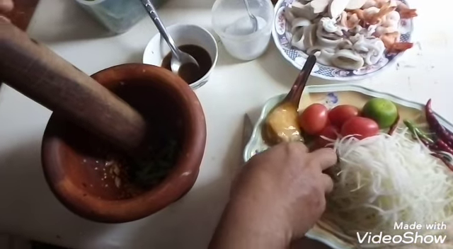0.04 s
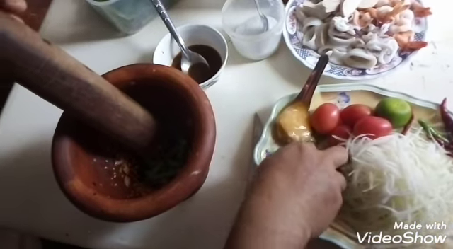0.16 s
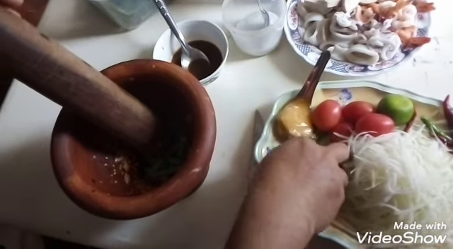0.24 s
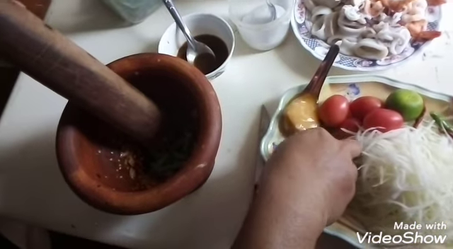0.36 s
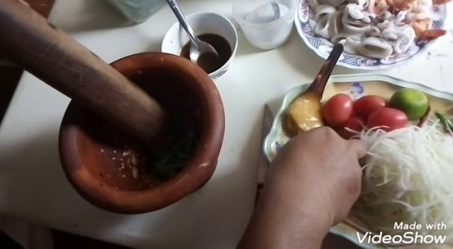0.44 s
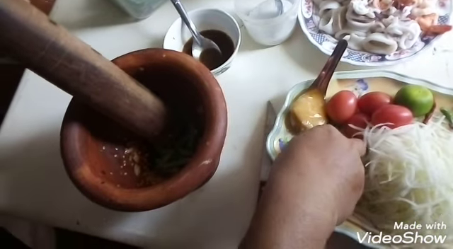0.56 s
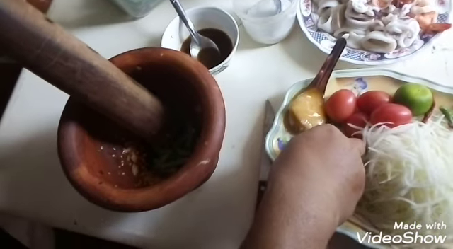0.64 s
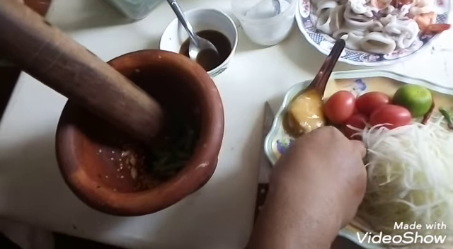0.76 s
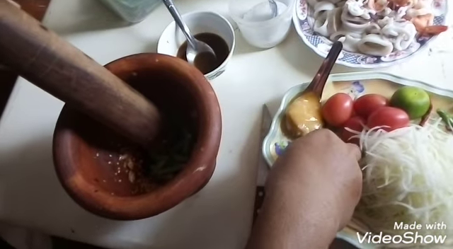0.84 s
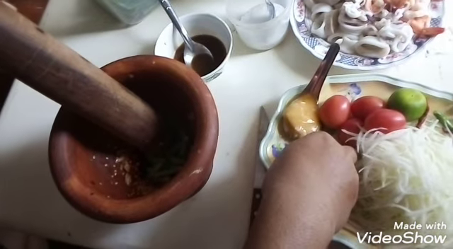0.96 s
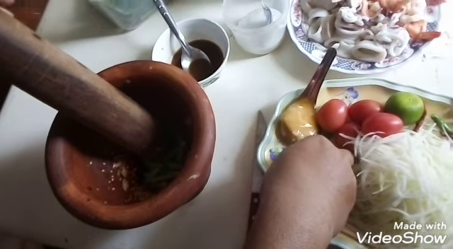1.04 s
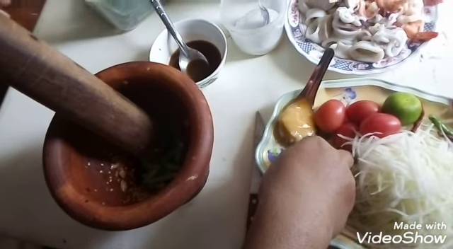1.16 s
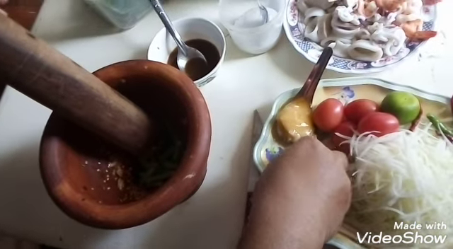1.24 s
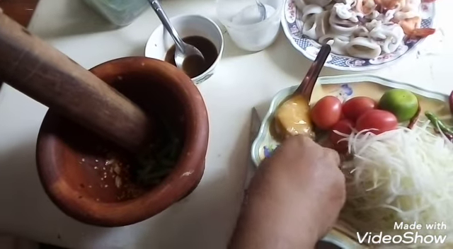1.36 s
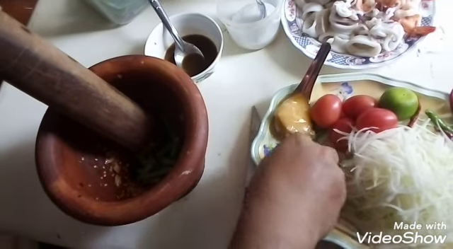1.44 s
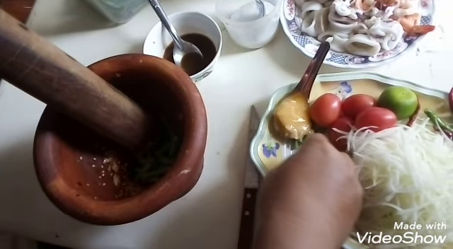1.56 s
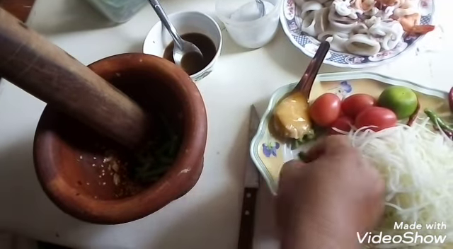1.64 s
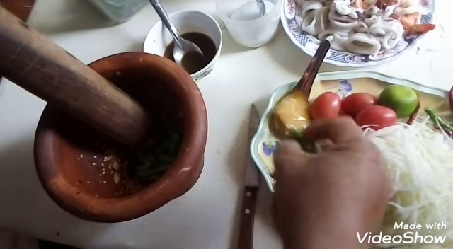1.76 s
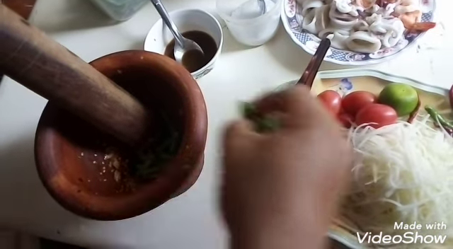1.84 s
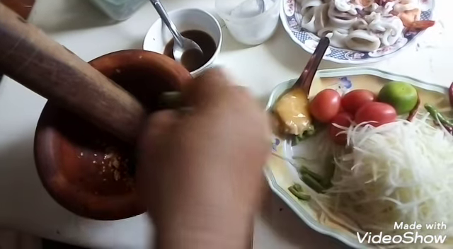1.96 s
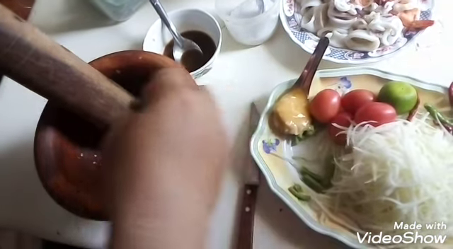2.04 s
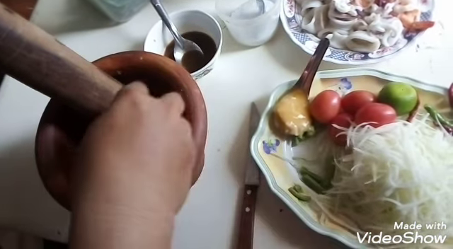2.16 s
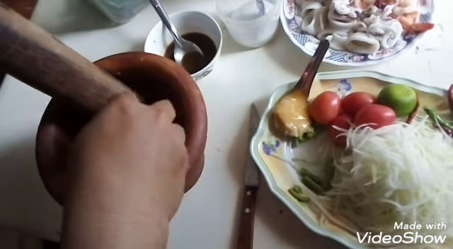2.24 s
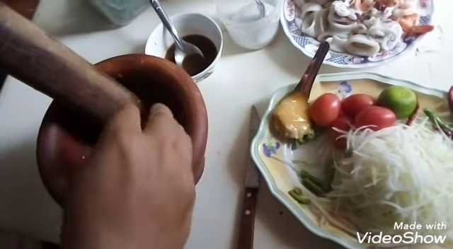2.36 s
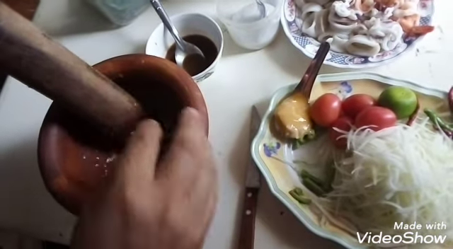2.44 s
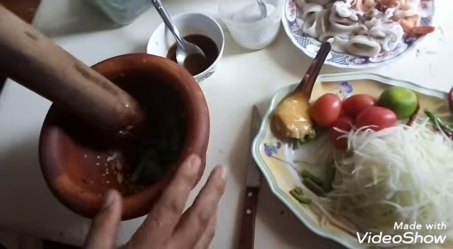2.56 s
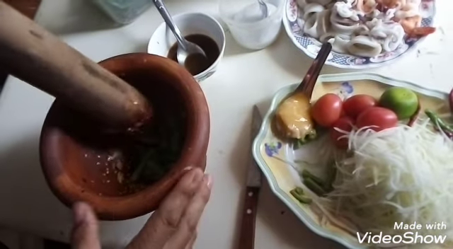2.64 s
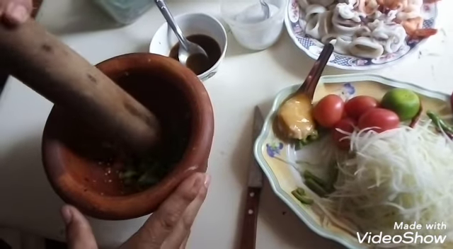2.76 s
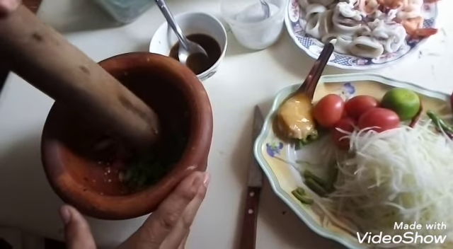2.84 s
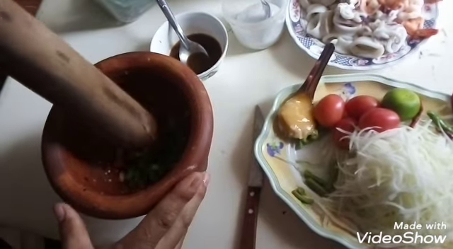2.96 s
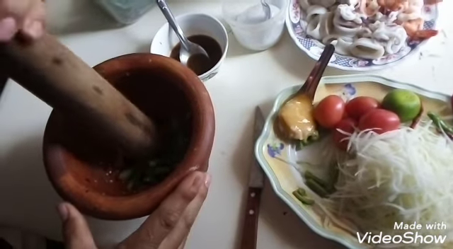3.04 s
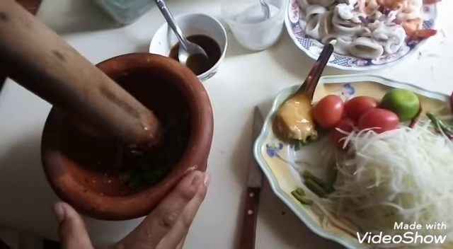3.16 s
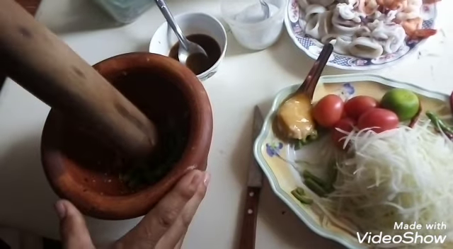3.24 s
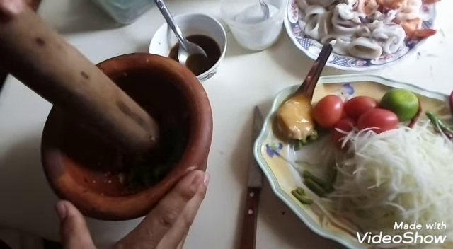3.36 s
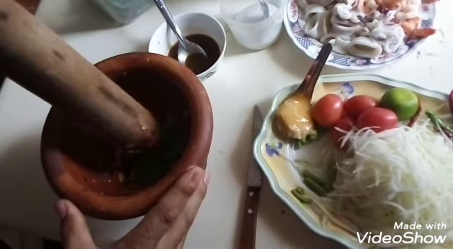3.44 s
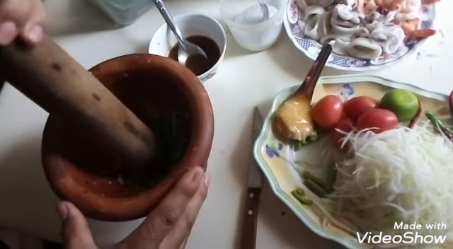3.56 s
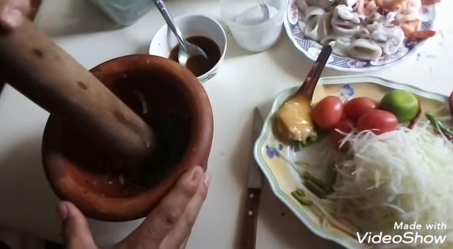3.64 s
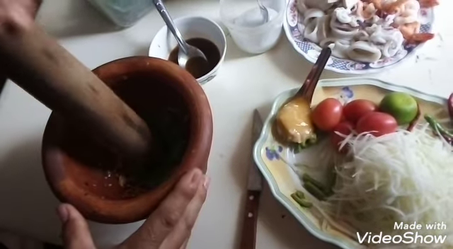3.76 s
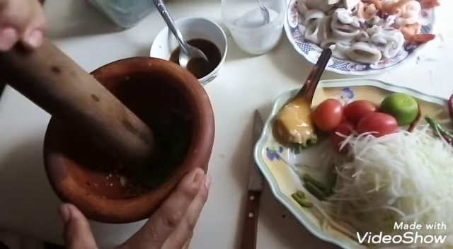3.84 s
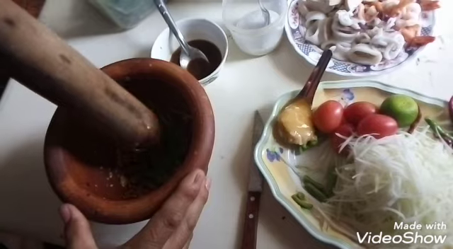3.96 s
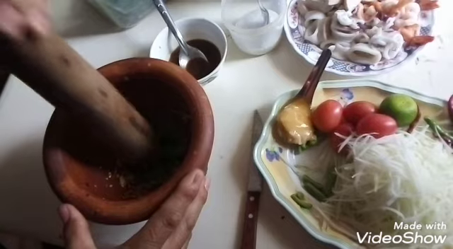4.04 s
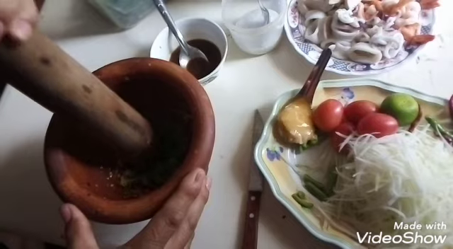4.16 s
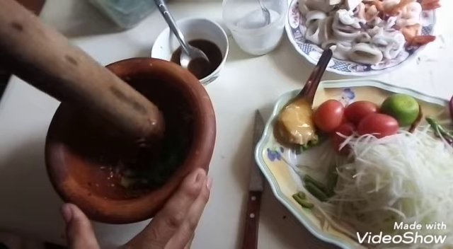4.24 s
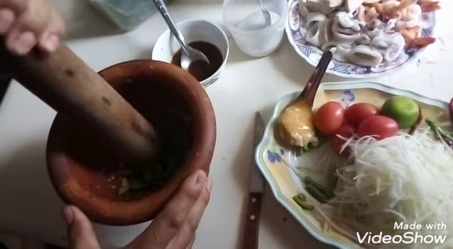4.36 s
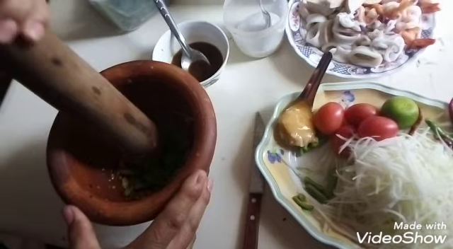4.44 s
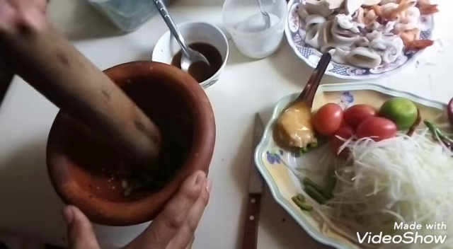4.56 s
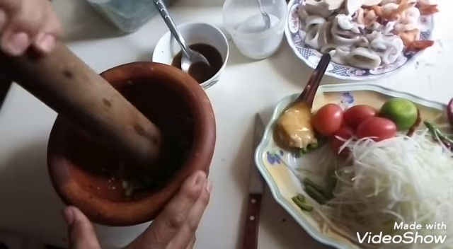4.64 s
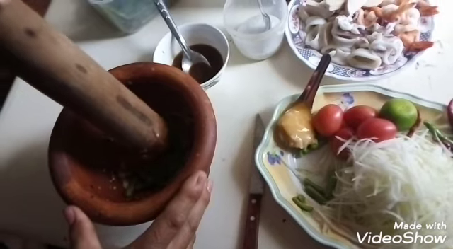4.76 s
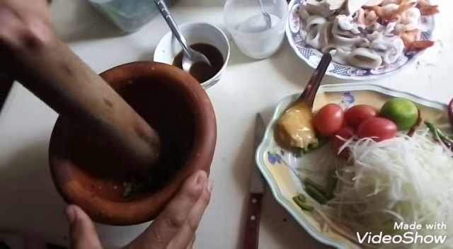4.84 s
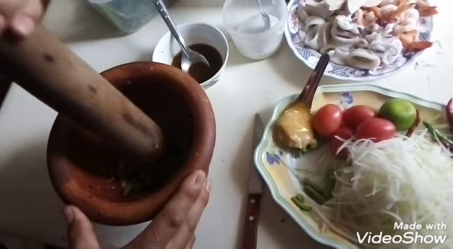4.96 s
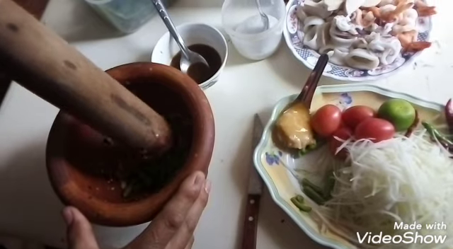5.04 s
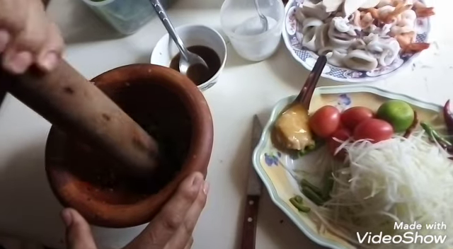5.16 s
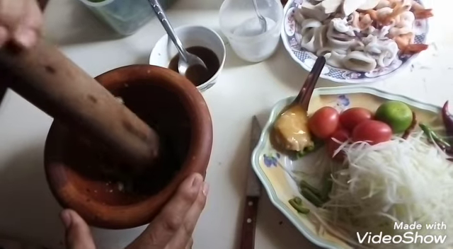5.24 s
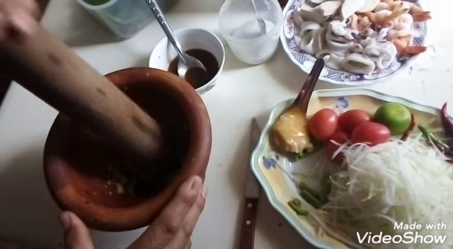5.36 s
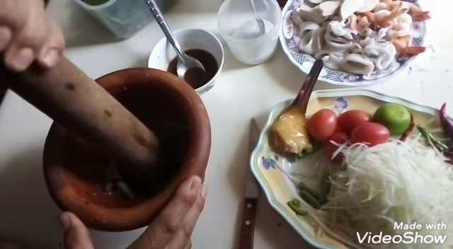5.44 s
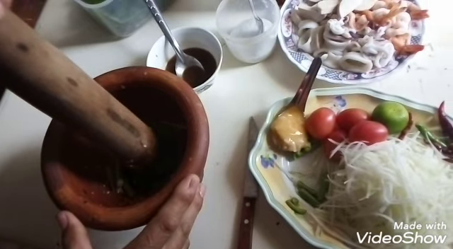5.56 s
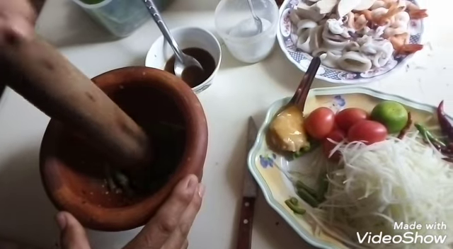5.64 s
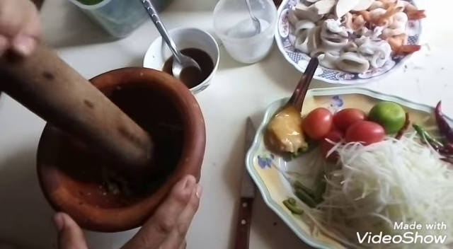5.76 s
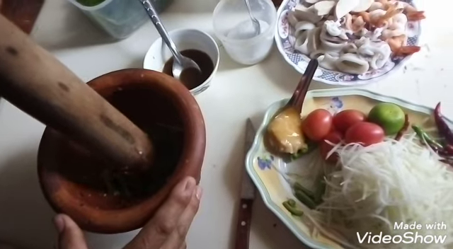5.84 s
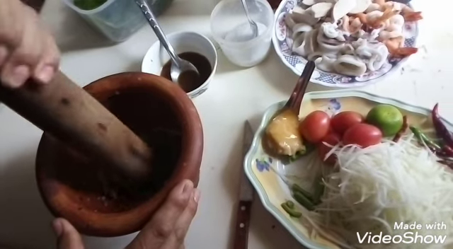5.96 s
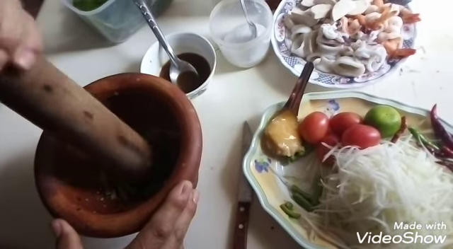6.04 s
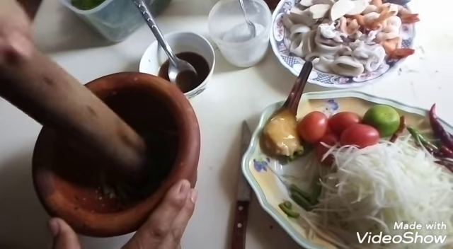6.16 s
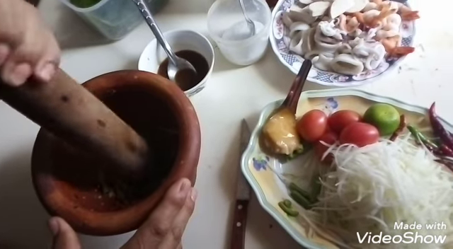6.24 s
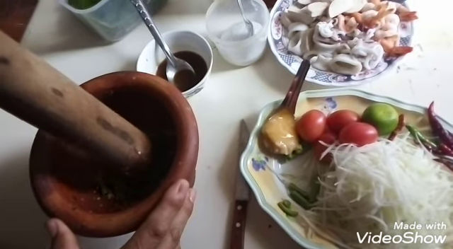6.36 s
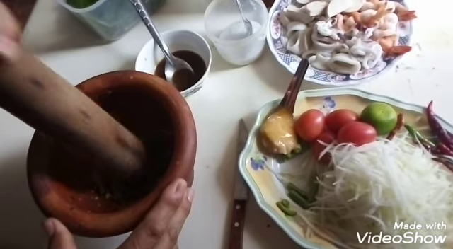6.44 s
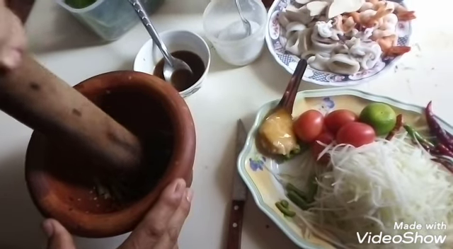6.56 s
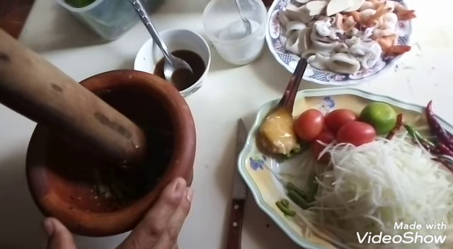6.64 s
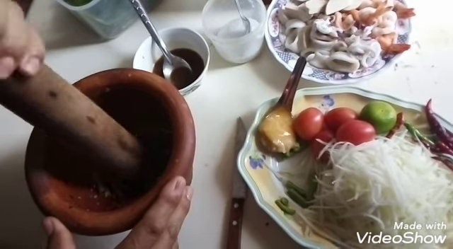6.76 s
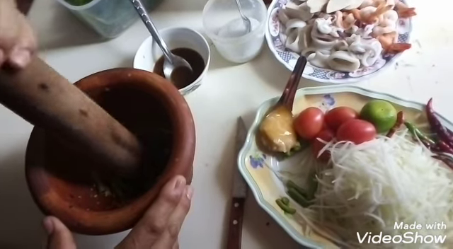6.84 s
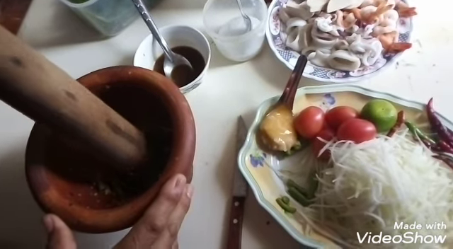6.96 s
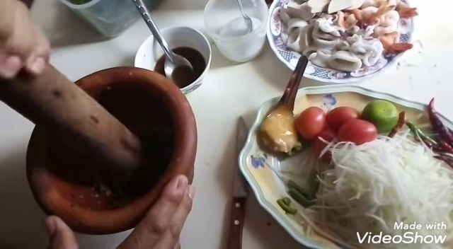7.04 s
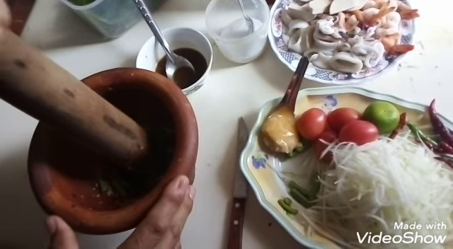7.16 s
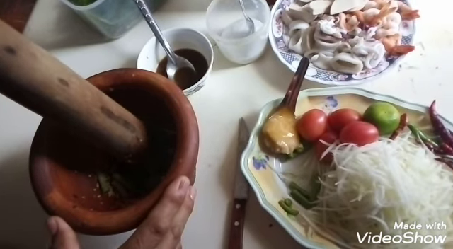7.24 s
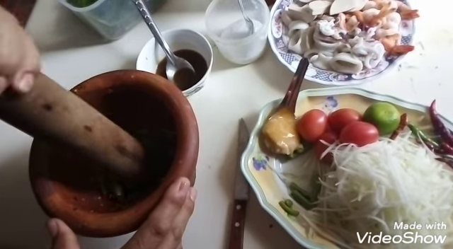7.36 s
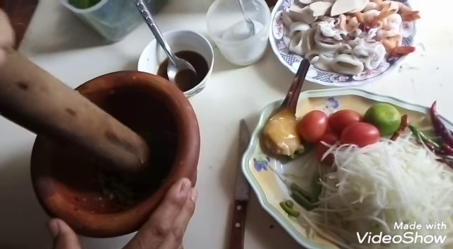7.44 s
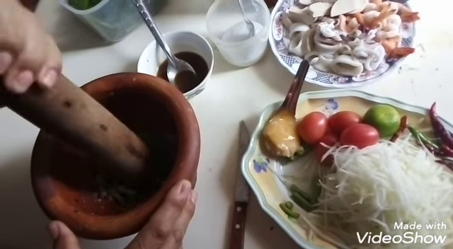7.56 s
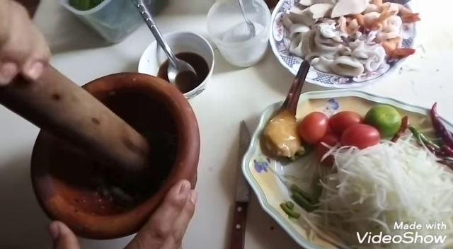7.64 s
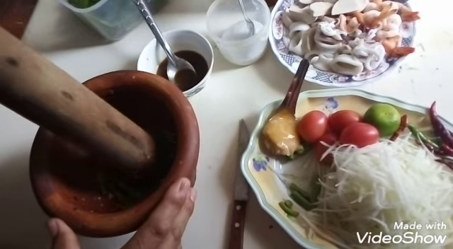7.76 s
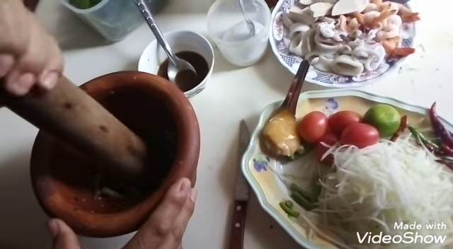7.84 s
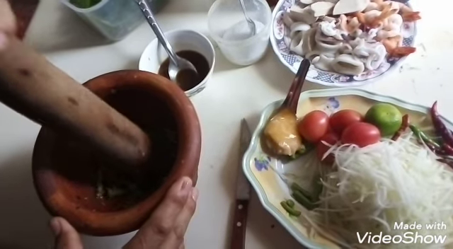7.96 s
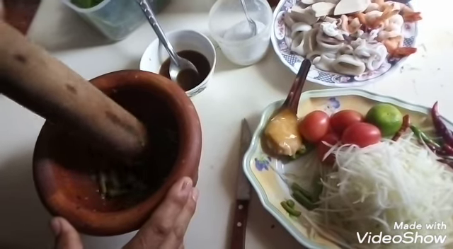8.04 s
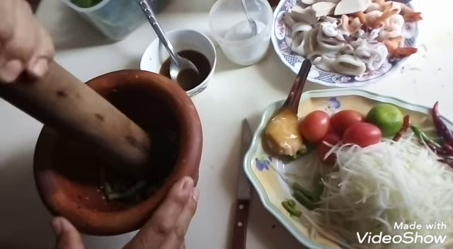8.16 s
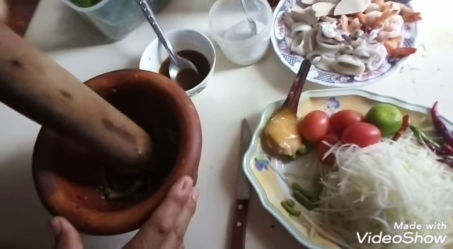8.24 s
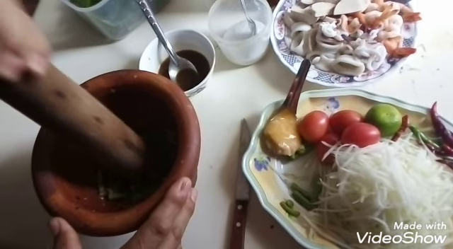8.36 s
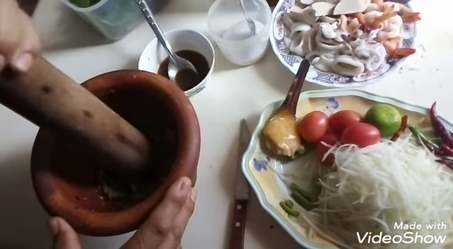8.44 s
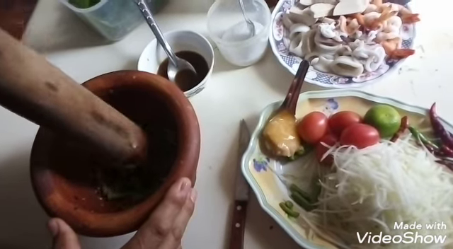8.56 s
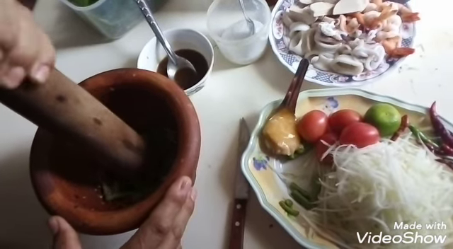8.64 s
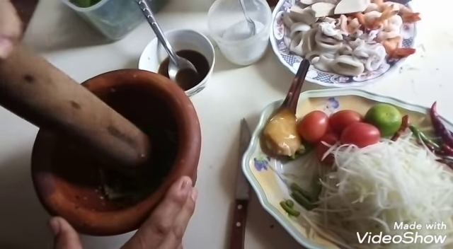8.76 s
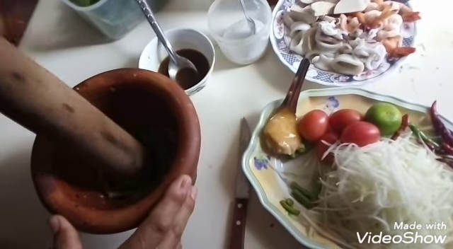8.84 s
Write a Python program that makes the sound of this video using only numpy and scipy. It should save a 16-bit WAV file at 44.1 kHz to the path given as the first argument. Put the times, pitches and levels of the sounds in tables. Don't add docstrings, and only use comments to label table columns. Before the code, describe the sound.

Close to a clay mortar on a kitchen counter: first quiet hiss, distant traffic and a small engine gathering speed, with faint knocks. Then regular pounding, nearly four strokes a second, each a gritty wet crunch followed at once by a clattering landing on the counter. Plates, bowl and spoons chatter; the blows grow harder, loudest past the middle, and continue to the end.

```python
import sys
import numpy as np
from scipy import signal
from scipy.fft import rfft, irfft, next_fast_len
from scipy.io import wavfile
from scipy.ndimage import uniform_filter1d

SR = 44100
rng = np.random.default_rng(int(sys.argv[2]) if len(sys.argv) > 2 else 0)


def dump_mix(stems):
    frames = np.atleast_2d(stems).T
    limited = np.clip(frames, -1, 1)
    pcm = np.round(limited * 32767).astype(np.int16)
    wavfile.write(sys.argv[1], SR, pcm)


def natural_amplitude(level_db):
    exponent = np.asarray(level_db, float) / 20
    return 10 ** exponent


N = 392931


def rms_one(x):
    return x / np.sqrt(np.mean(x ** 2) + 1e-20)


def in_time(rows):
    s, *columns = np.transpose(rows)
    return [np.interp(np.arange(N) / SR, s, c) for c in columns]


def at_hz(points, hz):
    points_hz, value = np.transpose(points)
    return np.interp(np.log(hz), np.log(points_hz), value)


def drift(rate_hz):
    r = np.exp(-80 * np.pi * rate_hz / SR)
    slow = signal.lfilter([1], [1, -2 * r, r * r], rng.standard_normal(N // 40 + 2002))[2000:]
    return np.interp(np.arange(N) / 40, np.arange(len(slow)), rms_one(slow))


def bands(low_hz, high_hz):
    edges = 25 * 2 ** np.arange(0, 9.6, .5)
    return [(np.sqrt(a * b), signal.butter(2, [a, b], "band", fs=SR, output="sos"))
            for a, b in zip(edges, edges[1:]) if b > low_hz and a < high_hz]


def resonate(x, modes):
    out = 0
    for k, (hz, width_hz, db) in enumerate(modes):
        r = np.exp(-np.pi * width_hz / SR)
        gain = (-1) ** k * natural_amplitude(db) * np.sqrt((1 - r * r) / 2)
        poles = [1, -2 * r * np.cos(2 * np.pi * hz / SR), r * r]
        out = out + signal.lfilter([gain, 0, -gain], poles, x + 1e-18)
    return out


# (time [s], level [dB])
HISS_LEVEL = [(0, -55.5), (1.5, -55), (2.6, -57), (3.2, -53.5), (8.91, -52.5)]
# (frequency [Hz], density [dB per Hz])
HISS_COLOUR = [(30, -6), (85, -18), (150, -17.5), (240, -17), (320, -24), (420, -33), (700, -31),
               (1130, -35.5), (2100, -38.5), (2700, -37.5), (3400, -52), (4200, -74), (5500, -40.5),
               (6800, -60.5), (7800, -84), (16000, -40)]


def hiss():
    white = rng.standard_normal((2, N))
    out = 0
    for k, (hz, sos) in enumerate(bands(30, 16000)):
        flicker_db = 1.3 * (1 if hz > 3300 else 2) * drift(10.0)
        out = out + natural_amplitude(at_hz(HISS_COLOUR, hz) + flicker_db) * signal.sosfilt(sos, white[k % 2])
    return natural_amplitude(in_time(HISS_LEVEL)[0] + 4) * rms_one(out)


def passing():
    return np.clip((2.8 - np.arange(N) / SR) / 0.47, 0, 1)


# (time [s], level [dB], rumble centre [Hz])
STREET = [(0.0, -48.5, 156), (0.27, -54, 165), (0.73, -45.5, 169), (0.99, -51, 198), (1.37, -44.5, 191),
          (2.29, -56.5, 187), (2.4, -57.5, 216.6), (2.63, -53.5, 187), (3.0, -57.5, 208)]
# (level [dB], rumble centre [Hz])
STREET_LATE = (-53.5, 180)


def street():
    return in_time([*STREET, (3.3, *STREET_LATE)])


# (frequency [Hz], width [Hz], level [dB])
BOOMS = [
    [(100, 30, -6), (142, 7, 0)],
    [(164, 6, 0), (179, 6, 0)],
    [(213, 7, 0), (245, 25, -6)],
]
BOOM_CENTRES_HZ = [137, 169, 201]
BOOM_LOSS_DB_PER_OCTAVE, BOOM_SWAY_DB, BOOM_NOISE_DB = 12.5, 3, -7


def rumble():
    level_db, centre_hz = street()
    out = 0
    for group, hz in zip(BOOMS, BOOM_CENTRES_HZ):
        off_octaves = abs(np.log2(centre_hz / hz))
        db = level_db - BOOM_LOSS_DB_PER_OCTAVE * off_octaves + BOOM_SWAY_DB * drift(1.73)
        boom = resonate(rng.standard_normal(N), group)
        boom = resonate(boom, [(group[1][0], 90, 0)])
        out = out + natural_amplitude(db + BOOM_NOISE_DB * passing()) * rms_one(boom)
    return out


# (time [s], rate [firings per s])
SPEED = [(0, 14.4), (.27, 14.7), (.5, 15.8), (.7, 16.3), (.95, 17.2), (1.15, 17.7), (1.5, 17.95),
         (1.8, 18.15), (2.6, 18)]
ORDERS = [6, 8, 10, 12, 14]
# (frequency [Hz], level rel traffic [dB])
TONE_COLOUR = [(85, -13), (110, -9), (128, -8), (145, -3), (165, -2), (180, -2), (198, -9), (213, -2),
               (255, -15)]
ORDER_SWAY_DB = 2


def exhaust_tones():
    level_db = street()[0]
    per_s = in_time(SPEED)[0]
    turns = np.cumsum(per_s) / SR
    out = np.zeros(N)
    for order in ORDERS:
        db = level_db + at_hz(TONE_COLOUR, order * per_s) + ORDER_SWAY_DB * drift(2.2)
        out += natural_amplitude(db) * passing() * np.sin(2 * np.pi * order * turns)
    return out


# (time [s], level [dB])
ENGINE_LEVEL = [(0, -70.5), (.27, -66), (.63, -68.5), (1.2, -65.5), (1.64, -63.5), (2.1, -70), (2.6, -65)]
# (frequency [Hz], width [Hz], level [dB])
EXHAUST = [(423, 30, 2), (1100, 90, -7), (1450, 170, 1), (1680, 77, 0.5), (1785, 82, 2), (2370, 82, -6),
           (2645, 65, -5)]


def exhaust_puffs():
    per_s, db = in_time(SPEED) + in_time(ENGINE_LEVEL)
    turns = np.cumsum(per_s * natural_amplitude(.2 * drift(4.2))) / SR
    strength = natural_amplitude(rng.normal(0, 2, 400))[turns.astype(int)]
    puffs = (strength * np.exp(-(turns % 1) / .35) + .2) * rng.standard_normal(N)
    return natural_amplitude(db + 6.5) * passing() * rms_one(resonate(puffs, EXHAUST))


def dull_rings(events):
    out, t = np.zeros(N + SR), np.arange(SR // 4) / SR
    for s, db, hz, t60 in events:
        i = round(s * SR)
        mode = [(hz, .45 * hz, 0)]
        puff = (rng.standard_normal(len(t)) + 8 * (t == 0)) * natural_amplitude(-60 * t / t60)
        puff = resonate(resonate(puff, mode), mode)
        out[i:i + len(t)] += natural_amplitude(db) * puff / np.max(abs(puff))
    return out[:N]


# (time [s], peak [dB], pitch [Hz], t60 [s])
KNOCKS = [(0.175, -39, 750, 0.09), (0.43, -47.5, 650, 0.19), (0.459, -41, 805, 0.14),
          (0.774, -46, 700, 0.17), (1.17, -50, 560, 0.2), (1.199, -47, 780, 0.13), (0.18, -51, 2300, 0.15),
          (0.8, -51, 900, 0.25), (1.869, -42, 5500, 0.03), (2.387, -38.5, 700, 0.13),
          (2.47, -54, 880, 0.94), (8.212, -41.5, 580, 0.11), (8.298, -50.5, 563, 0.19)]
# (time [s], peak [dB], pitch [Hz], t60 [s])
THUDS = [
    (2.389, -31.5, 228, 0.15),
    (2.799, -41.5, 235, 0.25),
    (8.203, -38, 238, 0.18),
    (8.688, -26.5, 183, 0.29),
]


def far_knocks():
    return dull_rings([*KNOCKS, *THUDS])


# (time [s], peak [dB], pitch [Hz], t60 [s])
CLAY_HITS = [(4.9215, -25.5, 1350, 0.26), (6.533, -14.5, 650, 0.088), (7.081, -6, 1500, 0.05),
             (7.083, -13.5, 738, 0.35), (7.697, -23, 590, 0.18), (7.648, -25, 580, 0.23),
             (6.008, -25, 1430, 0.18), (5.184, -24.5, 277, 0.15)]
# (time [s], peak [dB], pitch [Hz], t60 [s])
WOOD = [(3.381, -23, 756, 0.08), (3.639, -27, 1720, 0.09), (3.9, -21, 750, 0.09), (4.112, -29, 567, 0.09),
        (4.162, -28, 1730, 0.09), (4.399, -38, 589, 0.09), (4.446, -27, 622, 0.11),
        (4.703, -21, 1350, 0.09), (4.968, -19, 587, 0.09), (5.179, -28, 1900, 0.09),
        (5.245, -21, 1460, 0.1), (5.511, -28, 740, 0.09), (5.539, -31.5, 1530, 0.09),
        (5.775, -38, 816, 0.09), (5.999, -22, 1810, 0.13), (6.049, -18, 821, 0.09),
        (6.271, -23, 1320, 0.14), (6.316, -19.5, 1310, 0.09), (6.589, -13.5, 587, 0.072),
        (6.856, -20, 1450, 0.09), (7.137, -15.5, 1700, 0.09), (7.373, -27, 1900, 0.09),
        (7.635, -28.5, 595, 0.09), (7.897, -25, 1650, 0.11), (7.957, -21, 614, 0.09),
        (8.414, -26.5, 818, 0.099), (8.482, -20.5, 619, 0.071), (8.674, -35, 1700, 0.09),
        (8.743, -17, 880, 0.082)]
WOOD_DB = -4.5


def clay_knocks():
    return dull_rings([*CLAY_HITS, *((s, db + WOOD_DB, hz, t60) for s, db, hz, t60 in WOOD)])


# (time [s], peak [dB], push length [s])
SLAMS = [(3.385, -19, 0.0032), (3.901, -21, 0.0029), (4.403, -22, 0.0042), (4.448, -22.5, 0.0036),
         (4.974, -13.5, 0.0026), (5.186, -31, 0.0054), (5.244, -16, 0.0024), (5.513, -25, 0.0026),
         (6.051, -22, 0.0026), (6.319, -37, 0.0046), (6.5295, -15, 0.0035), (6.538, -23, .003),
         (6.593, -22, 0.0023), (6.861, -22, 0.0032), (7.0785, -7, 0.0029), (7.094, -24, .003),
         (7.698, -26.5, 0.0022), (7.958, -19.5, 0.0034), (8.419, -26, 0.0039), (8.48, -22, 0.0029),
         (8.748, -31, 0.0023)]
# (frequency [Hz], width [Hz], level [dB])
COUNTER = [(85, 14, -8), (116.5, 20.7, 0.5), (187.3, 22.6, -0.5), (232, 66, -2), (231, 19.5, -2),
           (339.6, 4.5, -20.5)]
SLAM_RING_DB = -9.5


def slams():
    out, t = np.zeros(N + SR), np.arange(SR // 4) / SR
    for s, db, length_s in SLAMS:
        window = np.sin(np.pi * np.minimum(t / (3 * length_s), 1)) ** 2
        swing = -np.sin(np.pi * t / length_s) * window
        ring = resonate(swing, COUNTER)
        i = round((s - 1.5 * length_s) * SR)
        out[i:i + len(t)] += natural_amplitude(db) * (swing + natural_amplitude(SLAM_RING_DB) * ring / np.max(abs(ring)))
    return out[:N]


# (time [s], peak [dB], pitch [Hz])
TICKS = [(3.073, -21, 2250), (3.083, -34, 2230), (3.1235, -25, 2410), (3.3232, -38, 1500),
         (3.3233, -24, 4100), (3.5853, -19, 6260), (3.6372, -19, 2350), (3.838, -24, 2210),
         (4.0936, -36, 5360), (4.114, -17, 4700), (4.16, -11.5, 2480), (4.3822, -29, 5600),
         (4.4380, -20, 5000), (4.4473, -13, 2750), (4.484, -10, 3100), (4.6484, -16, 3530),
         (4.7022, -15, 2500), (4.9056, -13.5, 5460), (4.9715, -14, 4730), (5.1811, -33, 5420),
         (5.2418, -21, 2710), (5.454, -19.5, 5650), (5.5078, -22, 2470), (5.5387, -24.5, 3000),
         (5.697, -43, 1580), (5.711, -29, 5630), (5.7264, -30.5, 4770), (5.7738, -28.5, 2950),
         (5.9893, -35, 1810), (6.052, -15.5, 1770), (6.2562, -38, 2010), (6.319, -14.5, 2250),
         (6.3583, -20, 4690), (6.5285, -20.5, 1620), (6.539, -8, 2140), (6.5837, -8, 5500),
         (6.5967, -3, 2300), (6.6363, -8, 4770), (6.6634, -16, 2310), (6.688, -18, 2500),
         (6.796, -16, 5380), (6.8621, -3.5, 2430), (7.0805, -6, 2100), (7.139, -4, 2330),
         (7.1765, -4, 2250), (7.3432, -44, 5400), (7.3555, -26, 5470), (7.3732, -19, 2370),
         (7.636, -25.5, 2020), (7.696, -25, 2230), (7.7348, -23, 2300), (7.894, -23.5, 5200),
         (7.9543, -11, 1760), (7.993, -11, 2500), (8.1496, -27, 5660), (8.4154, -10.5, 5400),
         (8.475, -17, 2220), (8.5136, -29, 2330), (8.675, -34, 5400), (8.744, -31, 1710)]
TICK_DB, TICK_T60_S, TICK_EDGE_DB = -3.5, 0.023, -5
TICK_SPREAD = .25


def ticks():
    out, t = np.zeros(N + SR), np.arange(SR // 30) / SR
    grit = rng.standard_normal((len(TICKS), len(t))) + 2.5 * (t == 0)
    edge_sos = signal.butter(2, [900, 15000], "band", fs=SR, output="sos")
    for (s, db, hz), row in zip(TICKS, grit * natural_amplitude(-60 * t / TICK_T60_S)):
        ring = rms_one(resonate(row, [(hz, TICK_SPREAD * hz, 0)]))
        edge = rms_one(signal.sosfilt(edge_sos, row))
        tick = ring + natural_amplitude(TICK_EDGE_DB) * edge
        i = round((s - .0005) * SR)
        out[i:i + len(t)] += natural_amplitude(db + TICK_DB) * tick / np.max(abs(tick))
    return out[:N]


def grains(per_s, spread_db, smooth):
    sizes = natural_amplitude(spread_db * np.minimum(rng.exponential(1, N), 4)) * rng.choice([-1, 1], N)
    clicks = rms_one(sizes * (rng.random(N) < per_s / SR))
    return rms_one(clicks + smooth * rng.standard_normal(N))


def with_crack(grit, events, crack_db):
    clicks = np.zeros(N)
    clicks[[round(row[0] * SR) + 8 for row in events]] = natural_amplitude(crack_db)
    return grit + clicks


ZONES_HZ = [170, 750, 2600, 7000]
# (frequency [Hz], factor)
LINGER = [(80, 1.66), (250, 1.03), (1000, 1.164), (4000, 0.97), (12000, 0.6)]


def force(events, hz, rise_s, creep_db, snap_db):
    rate = SR // 8
    power, t = np.zeros(N // 8 + rate), np.arange(-rate // 90, rate // 3) / rate
    before = natural_amplitude(creep_db * 2) * np.exp(np.minimum(t, 0) / abs(rise_s)) * (t < 0)
    snap = natural_amplitude(2 * snap_db) * np.exp(-abs(t) / 0.003)
    for s, db, low, mid, high, t60 in events:
        level_db = db + np.interp(np.log(hz), np.log(ZONES_HZ), [low, mid, 0, high])
        decay = natural_amplitude(-120 * np.maximum(t, 0) / (t60 * at_hz(LINGER, hz)))
        after = (decay + snap) * (t >= 0)
        i = round((s - 1.0 / hz) * rate) - rate // 90
        power[i:i + len(t)] += natural_amplitude(2 * level_db) * (before + after)
    return np.repeat(np.sqrt(power), 8)[:N]


def contact(events, colour, grit, **shape):
    return sum(natural_amplitude(at_hz(colour, hz)) * signal.sosfilt(sos, force(events, hz, **shape) * grit[k % 2])
               for k, (hz, sos) in enumerate(bands(50, 16000)))


# (start [s], counter boom [dB], bowl [dB], plate [dB], spoon [dB])
SEATING = [(3.05, 0, 1, -1, -8), (3.3, -2, -4.0, 1, -5.5), (3.56, -0.5, -3.0, 0, -3.5),
           (3.82, -4, 1, -6, 1.5), (4.08, 3, 1.5, -2, 0), (4.37, 2.5, 2, 3, 0.0),
           (4.62, 1.0, -1.0, 4.5, -7.5), (4.89, -5.5, -3, -3, 2.5), (5.16, 1.5, -5, 1, -0.5),
           (5.43, 6, -0.0, 2.0, 2), (5.69, 4, 12, -2.0, 3.0), (5.96, -0.5, -0.5, -5.5, -2.5),
           (6.24, -6, -0.5, -3.0, 2.5), (6.51, -4.5, -0.0, -4.0, 2), (6.78, -1.0, 1.5, -2.5, -1.5),
           (7.06, 3, 1.0, -0.5, -1.5), (7.33, 3.5, 6.0, -9, -3.0), (7.61, -8.5, 2, 3.0, -4),
           (7.88, -1.5, 1, -4, 1), (8.12, 3.0, 3, -3.0, -3.0), (8.39, -2, -0.5, -1, -0.5),
           (8.66, -4.5, 0, -2, 1)]
# (low [Hz], high [Hz])
FAMILIES_HZ = [
    (60, 150),
    (2250, 2560),
    (3450, 3750),
    (4550, 4850),
]


def seated(x, modes):
    rows = np.array(SEATING)
    stroke = np.searchsorted(rows[:, 0] * SR, np.arange(N)).clip(1) - 1
    out = 0
    for k, mode in enumerate(modes):
        drive = x[k % len(x)]
        family = [j + 1 for j, (low, high) in enumerate(FAMILIES_HZ) if low < mode[0] < high]
        if family:
            drive = natural_amplitude(rows[:, family[0]])[stroke] * drive
        out = out + (-1) ** k * resonate(drive, [mode])
    return out


# (time [s], peak [dB], weight rel [dB], splash rel [dB])
CRUSHES = [(3.0702, -28, -7, -22), (3.3238, -27.5, -6.5, -9.5), (3.5707, -32.5, -4, -4.5),
           (3.838, -30, -1, -4.5), (4.1093, -28.5, 1, -17), (4.3817, -30, -8, -5.5),
           (4.6458, -23, -9.5, -12), (4.9211, -21.5, -5.5, -39), (5.181, -26.5, -2, -2),
           (5.4532, -33.5, -7, -1), (5.7251, -28, -11.5, -6), (5.9899, -23, -4, -7.5),
           (6.2651, -23, -2, -46), (6.5382, -19, -7.5, -13), (6.7978, -20.5, -9.5, -8),
           (7.0827, -9.5, -2, -15), (7.3734, -23, -8, -17.5), (7.637, -19.5, -6, -14.5),
           (7.895, -26.5, -0.5, -3), (8.1524, -33, -9.5, -6.5), (8.4159, -22, -5, -12.5),
           (8.681, -26, -5.5, -8.5)]
# (time [s], peak [dB], splash rel [dB])
TOUCHES = [(3.0597, -48, 12), (3.5858, -36.5, -1), (4.096, -32.5, -2), (4.399, -30.5, -27),
           (4.634, -36.5, -7), (4.91, -35.5, 1.5), (5.168, -51, 8), (5.437, -57, 12), (5.6997, -49, -9),
           (5.9707, -46, -1), (6.2546, -33, 1.5), (6.5299, -18, -14.5), (7.344, -38.5, -0.5),
           (7.626, -41.5, -1), (8.134, -50.5, 8), (8.208, -43, -10), (8.4068, -56, -8), (8.6742, -36, -2)]
CRUSH_CLAY_DB, CRUSH_T60_S = -12.5, 0.17
TOUCH_WEIGHT_DB, TOUCH_CLAY_DB, TOUCH_T60_S = -5, -9, 0.16


def pestle_blows():
    crushes = [(s, db, w, w + CRUSH_CLAY_DB, hi, CRUSH_T60_S) for s, db, w, hi in CRUSHES]
    touch_clay_db = TOUCH_WEIGHT_DB + TOUCH_CLAY_DB
    return crushes + [(s, db, TOUCH_WEIGHT_DB, touch_clay_db, hi, TOUCH_T60_S) for s, db, hi in TOUCHES]


# (time [s], peak [dB], weight rel [dB], clatter rel [dB])
LANDINGS = [(3.1216, -24.5, -20.5, -20.5), (3.3826, -17.5, -10, -8), (3.6382, -24, -13.5, -20),
            (3.9, -19, -11.5, -12.5), (4.1604, -19, -13, -15.5), (4.4482, -17.5, -15, -6),
            (4.702, -18, -12.5, -13), (4.971, -15.5, -9.5, -6), (5.2425, -17.5, -16, -9.5),
            (5.509, -34, -1.5, -20), (5.5388, -36, -25, -20), (5.7756, -41, 0.5, -25),
            (6.049, -14, -8.5, -6.5), (6.317, -16.5, -8, -4), (6.5823, -17.5, -3, -13.5),
            (6.8599, -15, -11.5, -6), (7.097, -19, -5, -1.5), (7.1362, -14.5, -10, -2),
            (7.6942, -15.5, -8.5, -8), (7.9562, -15, -9, -5.5), (8.475, -13, -12.5, -13),
            (8.7462, -14.5, -9.5, -3.5)]
# (time [s], peak [dB], t60 [s])
REBOUNDS = [(6.085, -20, 0.16), (6.3586, -18.5, 0.28), (6.5926, -14, 0.28), (6.6372, -17.5, 0.27),
            (6.6851, -24.5, 0.14), (7.1887, -18, 0.23), (7.7326, -18.5, 0.18), (7.9924, -18.5, 0.19),
            (8.5118, -16.5, 0.11)]
LANDING_CLAY_DB, LANDING_T60_S = -0.5, 0.21
REBOUND_WEIGHT_DB, REBOUND_CLAY_DB, REBOUND_CLATTER_DB = -49, -20.5, -6


def mortar_blows():
    landings = [(s, db, w, w + LANDING_CLAY_DB, hi, LANDING_T60_S) for s, db, w, hi in LANDINGS]
    return landings + [(s, db, REBOUND_WEIGHT_DB, REBOUND_CLAY_DB, REBOUND_CLATTER_DB, t60)
                       for s, db, t60 in REBOUNDS]


# (frequency [Hz], width [Hz], level [dB])
CROCKERY = [(1740, 70, -6), (2020, 80, -7), (2300, 60, -1), (2410, 55, -1), (2505, 35, -4), (2712, 60, -2),
            (3130, 80, -6), (3512, 60, -3), (3662, 60, -4), (4640, 70, -1), (4755, 70, -3), (5300, 160, -4),
            (6150, 90, -11), (7040, 90, -11), (7296, 35, -9), (9580, 90, -16)]
# (frequency [Hz], width [Hz], level [dB])
SINGERS = [(2300, 30, -6), (2410, 25, -5), (2505, 20, -6), (3512, 22, -3), (3662, 22, -3), (4640, 30, 0),
           (4755, 28, -1), (7296, 25, -5)]
SINGER_DB, SINGER_LINGER = -26, 1.77


def dishes(mortar, clatter):
    shake = force(mortar, hz=3450, rise_s=.0015, creep_db=-14.0, snap_db=-27.5)
    shake = shake * (shake / natural_amplitude(-20)) ** .3
    chatter = [shake * grains(700, spread_db=4.5, smooth=0.5) for dish in range(3)]
    rattle = seated([natural_amplitude(3 * drift(6)) * chatter[k % 3] for k in range(7)], CROCKERY)
    longer = [(*row[:5], SINGER_LINGER * row[5]) for row in mortar]
    late = force(longer, hz=3870, rise_s=.0015, creep_db=-23.0, snap_db=-28.5)
    singers = seated([late * (late / natural_amplitude(-20)) ** .3 * clatter], SINGERS)
    return natural_amplitude(-13.0) * rattle + natural_amplitude(SINGER_DB) * singers


# (frequency [Hz], width [Hz], level [dB])
CLAY = [(585, 35.5, -1), (624, 130, -4), (920, 130, -6), (1229, 17, -10), (1353, 35, -6)]


def bodies(both):
    push = with_crack(grains(300, spread_db=4, smooth=.3), both, crack_db=35)
    thump = seated([force(both, hz=187, rise_s=0.0011, creep_db=-3.5, snap_db=-7.5) * push], COUNTER)
    knock = resonate(force(both, hz=700, rise_s=0.0035, creep_db=2, snap_db=-20.0) * push, CLAY)
    return natural_amplitude(-8.0) * thump + natural_amplitude(-12.0) * knock


# (frequency [Hz], density [dB per Hz])
LANDING_COLOUR = [(60, 4), (120, 5), (250, 3.5), (400, -8.5), (700, -2.5), (1400, -9), (2500, -15.5),
                  (5000, -14.5), (8000, -11.5), (12000, -18.5), (15000, -8.5)]


def landing(mortar, clatter):
    return natural_amplitude(14.0) * contact(mortar, LANDING_COLOUR, clatter, rise_s=0.0017, creep_db=1.5, snap_db=0.0)


# (time [s], peak [dB], body rel [dB], treble rel [dB], t60 [s])
RUSTLES = [(1.866, -47, -22, -13, 0.23), (2.783, -56, -9, 9, 0.15), (2.796, -43, -15, 7, 0.17),
           (5.622, -55, -7, 4.5, 0.046), (8.293, -51, -10.5, -35, 0.14)]
# (frequency [Hz], density [dB per Hz])
CRUSH_COLOUR = [(60, -14), (120, -5.5), (250, 5.5), (400, -4), (700, 0.5), (1400, -5), (3000, -17.5),
                (5500, -7.5), (8000, -29), (12000, -19.5), (15000, -12.5)]


def crush(pestle):
    crunch = [with_crack(grains(2500, spread_db=3.0, smooth=0.59), pestle, crack_db=17.5) for side in "ab"]
    rustles = [(s, db, body, body, hi, t60) for s, db, body, hi, t60 in RUSTLES]
    return natural_amplitude(14.0) * contact(pestle + rustles, CRUSH_COLOUR, crunch,
                               rise_s=0.0038, creep_db=-5.5, snap_db=-0.5)


def pounding():
    pestle, mortar = pestle_blows(), mortar_blows()
    clatter = [with_crack(grains(1500, spread_db=3, smooth=0.9), mortar, crack_db=-9.0) for side in "ab"]
    return crush(pestle) + landing(mortar, clatter) + bodies(pestle + mortar) + dishes(mortar, clatter[0])


KITCHEN_T60_S, WALL_CUT_HZ, WET_DB = 0.32, 3300, -18


def kitchen(x):
    size = next_fast_len(N + SR)
    w = 2 * np.pi * np.arange(size // 2 + 1) / size
    dull = 1 / np.sqrt(1 + (w * SR / (2 * np.pi * WALL_CUT_HZ)) ** 2) ** 0.2
    walls = 0
    for k, lag in enumerate(rng.uniform(.011, 0.037, 8) * SR):
        loop = natural_amplitude(-60 * lag / SR / KITCHEN_T60_S) * dull * np.exp(-1j * w * round(lag))
        walls = walls + (-1) ** k * loop / (1 - loop)
    return irfft(rfft(x, size) * walls, size)[:N]


def scene():
    outside = rumble() + exhaust_tones() + exhaust_puffs()
    near = far_knocks() + clay_knocks() + slams() + ticks() + pounding()
    return (near + natural_amplitude(WET_DB) * kitchen(near) + outside + hiss())[None]


AIR_FROM_HZ = 10000
EARLY_DB, OPEN_FROM, OPEN_DB = 2, 2.3, -2.5


def hold_back(thinned, plain):
    split = signal.butter(2, AIR_FROM_HZ, "high", fs=SR, output="sos")
    air, plain_air = signal.sosfiltfilt(split, [thinned, plain])
    out = 0
    for part, true in ((thinned - air, plain - plain_air), (air, plain_air)):
        now, was = (np.sqrt(uniform_filter1d(v ** 2, size=130).clip(0) + 1e-12) for v in (part, true))
        lasting = signal.lfilter([.003], [1, -.997], was)
        edge = np.clip(was / (lasting + 1e-9) - OPEN_FROM, 0, 1)
        held = part * np.minimum(1, natural_amplitude(EARLY_DB) * np.maximum(was, lasting) / now)
        out = out + (1 - edge) * held + edge * natural_amplitude(OPEN_DB) * true
    return out


# (frequency [Hz], gain [dB])
PORT = [(6000, 1.5), (8500, -1.5), (10300, -3), (11500, -10), (13500, -15), (14500, -11), (15600, -9.5),
        (16300, -1)]
# (frequency [Hz], level rel strongest treble line [dB])
LINE_LIMITS = [(3000, -48), (6500, -41), (8000, -30), (10500, -29), (11500, -26), (16000, -30)]
QUIET_DB, ROUNDING_DB = -100, -88
LUCK_DB, LUCK_FROM_HZ = 4, 6700


def thin_treble(x):
    hz, t, z = signal.stft(x, SR, nperseg=1536)
    z = z * natural_amplitude(at_hz(PORT, hz + 1))[:, None]
    strongest = abs(z[hz > 2000]).max(axis=0)
    limit = np.maximum(natural_amplitude(at_hz(LINE_LIMITS, hz + 1))[:, None] * strongest, natural_amplitude(QUIET_DB))
    high = (hz > LUCK_FROM_HZ)[:, None]
    plain = signal.istft(z * high, SR, nperseg=1536)[1][:N]
    luck = rng.standard_normal((len(hz) // 2 + 1, len(t) // 4 + 1))
    luck = np.repeat(np.repeat(luck, 2, axis=0), 4, axis=1)[:len(hz), :len(t)]
    z = z * natural_amplitude(LUCK_DB * np.clip(luck, -2, 1.5) * high - 4)
    limit = np.maximum(limit, natural_amplitude(QUIET_DB + 4 - 6 * luck) * ~high)
    kept = z * ((abs(z) > limit) | (hz < 3000)[:, None])
    low, top = (signal.istft(kept * part, SR, nperseg=1536)[1][:N] for part in (~high, high))
    rounding = natural_amplitude(ROUNDING_DB - 4) * np.diff(rng.standard_normal(N + 1))
    return low + hold_back(top, natural_amplitude(-4) * plain) + rounding


def low_pass(x):
    return signal.sosfilt(signal.butter(12, 16810, fs=SR, output="sos"), x)


MIC_LOW_HZ, TOP_HZ = 65.5, 16140


def record(dry):
    x = signal.sosfilt(signal.butter(4, MIC_LOW_HZ, "high", fs=SR, output="sos"), dry[0])
    x = thin_treble(0.91 * np.tanh(x))
    x = signal.sosfilt(signal.cheby2(10, 40, TOP_HZ, fs=SR, output="sos"), x)
    return low_pass(x[None])


dry = scene()
out = record(dry)
dump_mix(out)
```